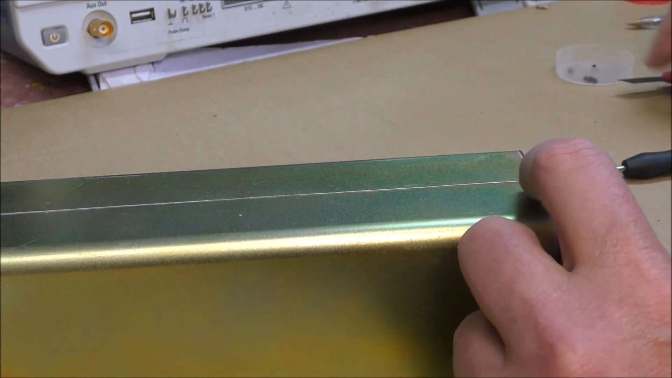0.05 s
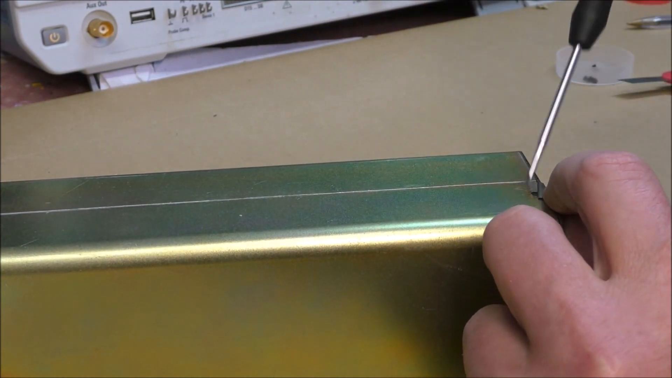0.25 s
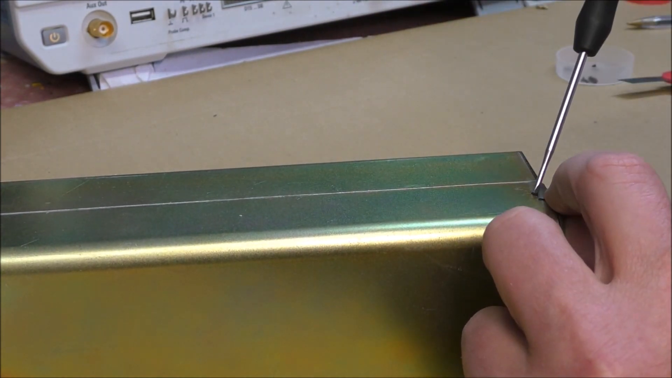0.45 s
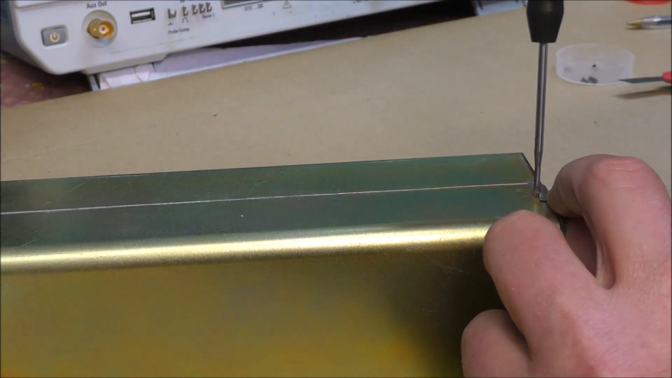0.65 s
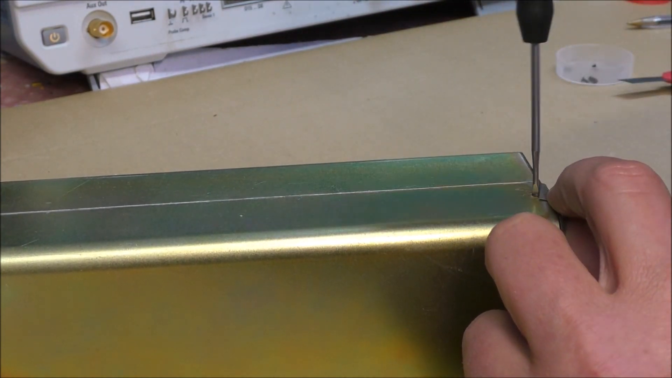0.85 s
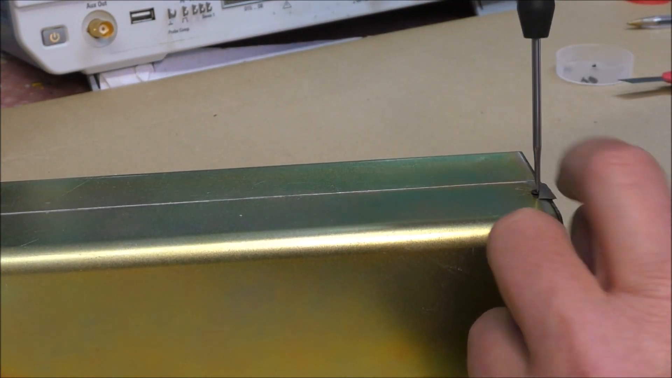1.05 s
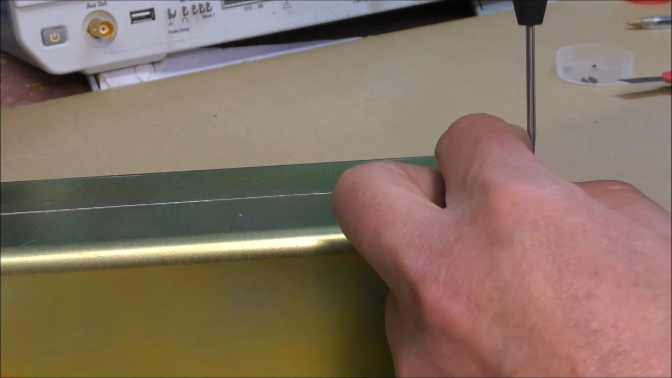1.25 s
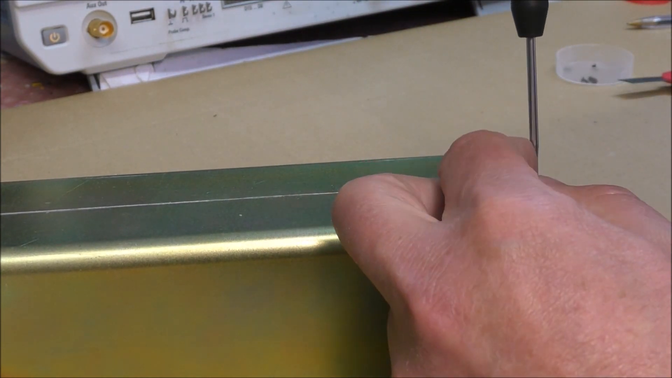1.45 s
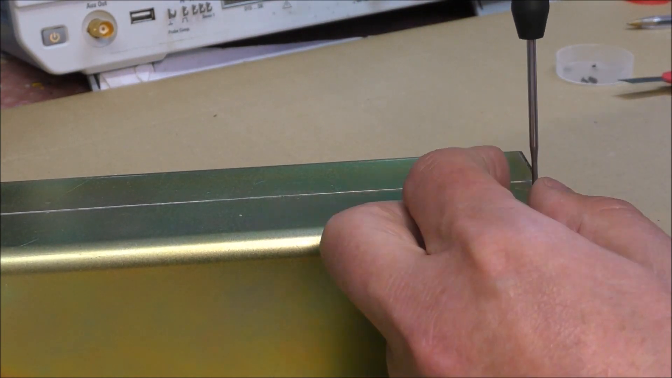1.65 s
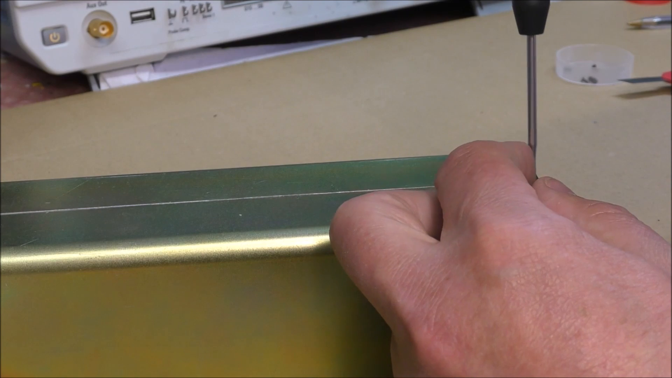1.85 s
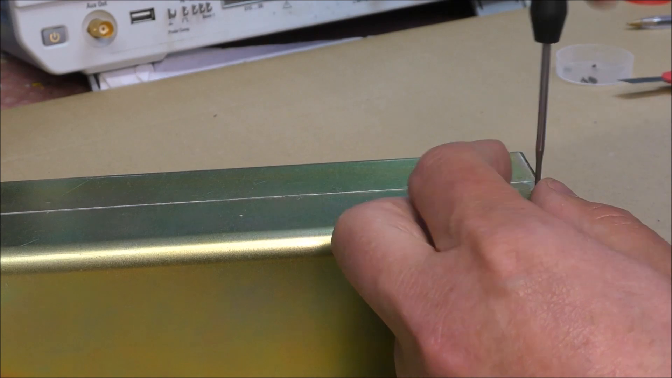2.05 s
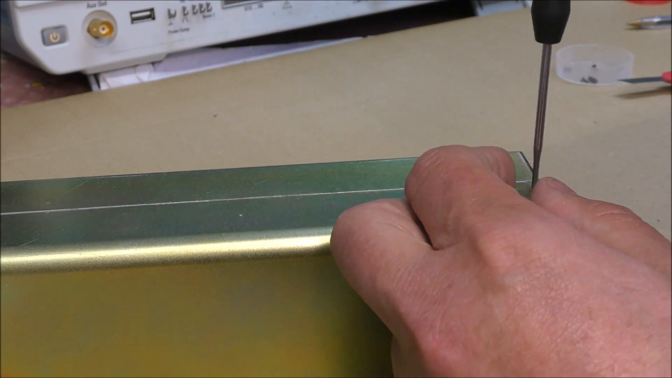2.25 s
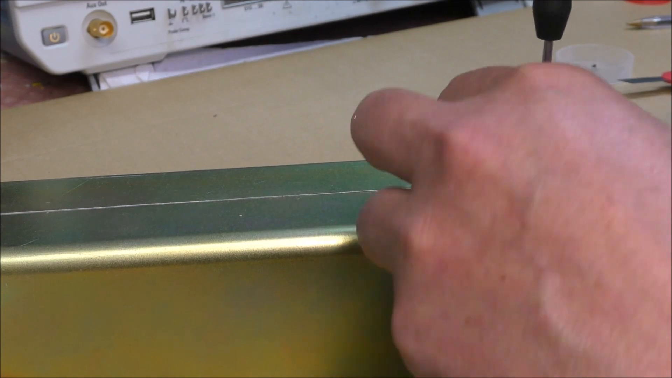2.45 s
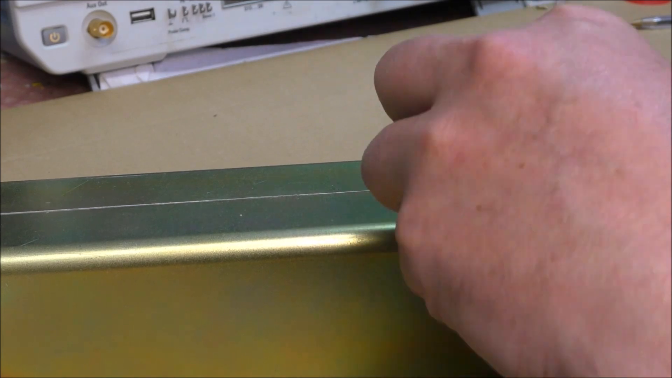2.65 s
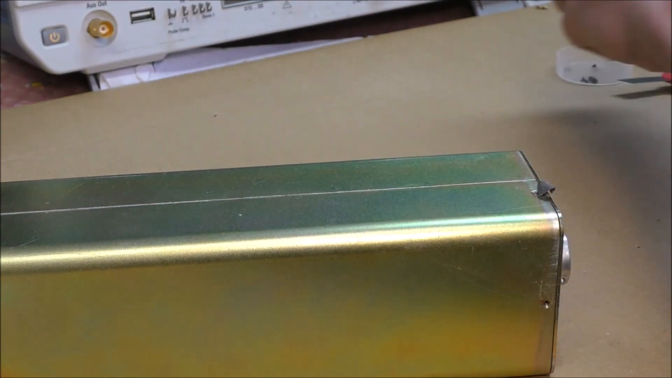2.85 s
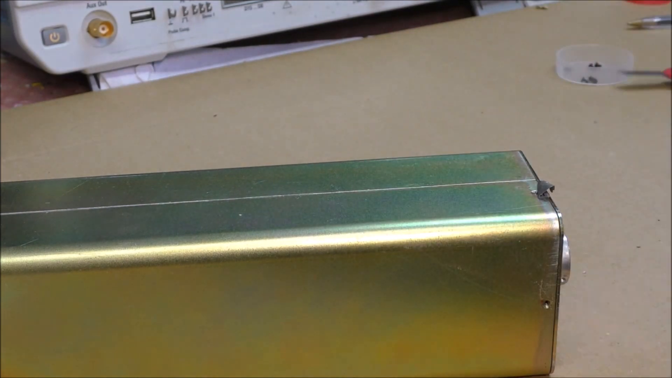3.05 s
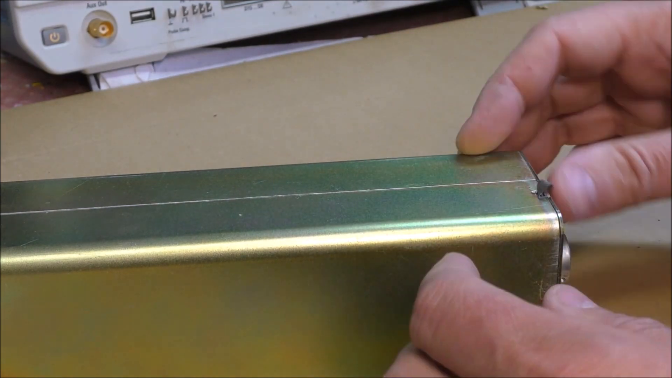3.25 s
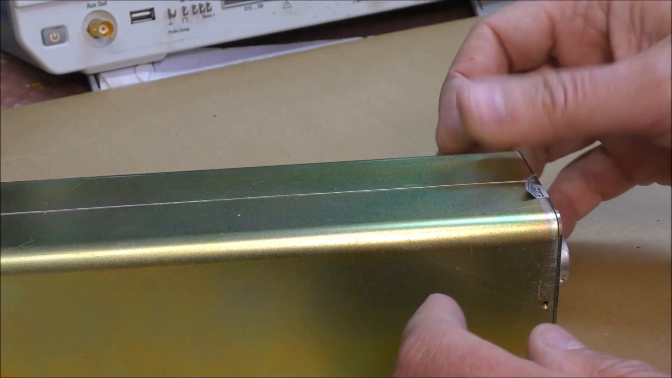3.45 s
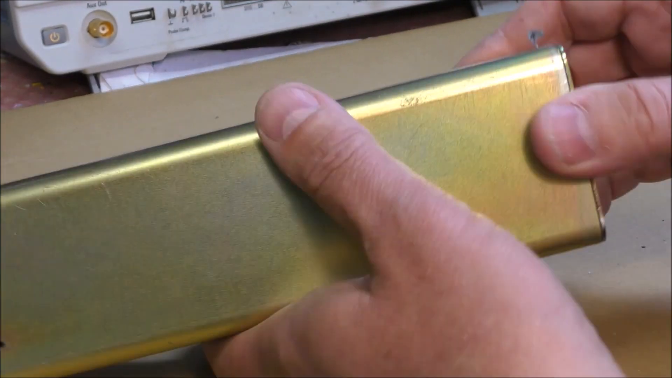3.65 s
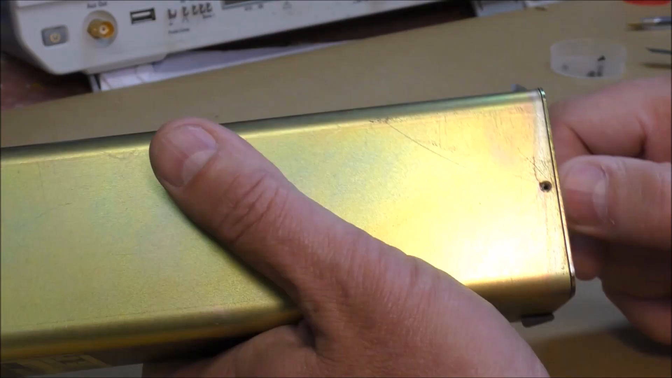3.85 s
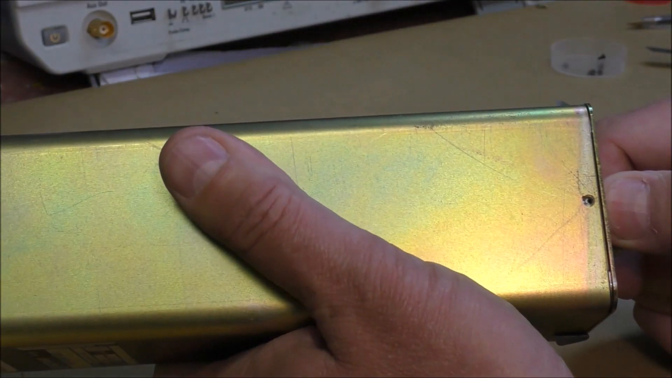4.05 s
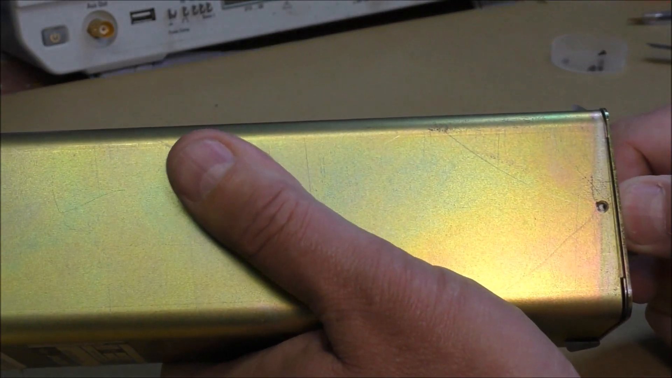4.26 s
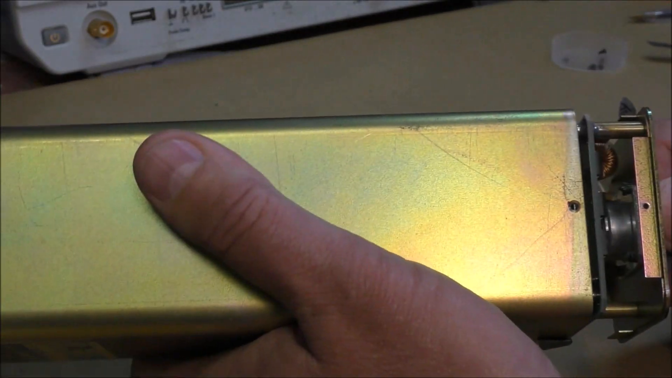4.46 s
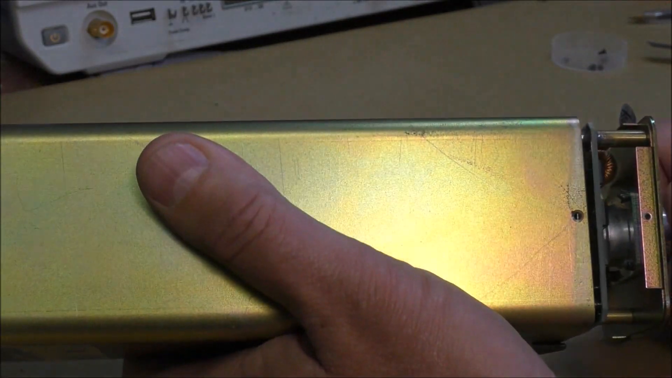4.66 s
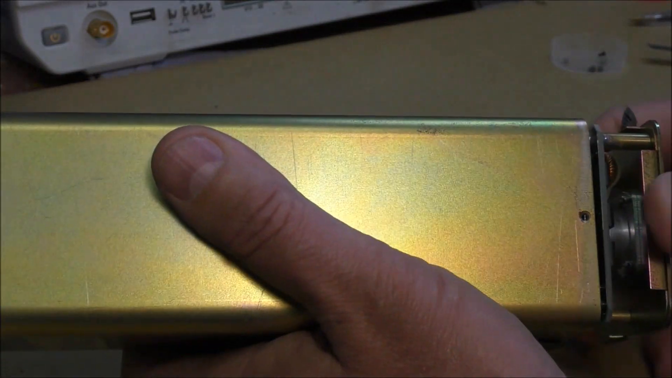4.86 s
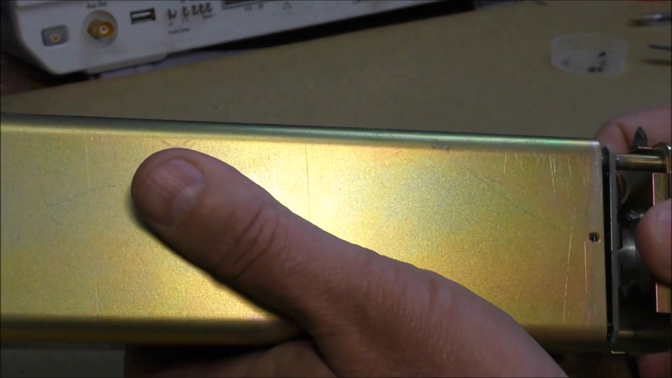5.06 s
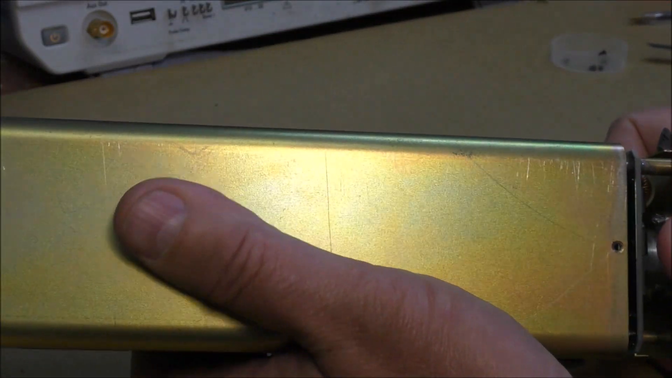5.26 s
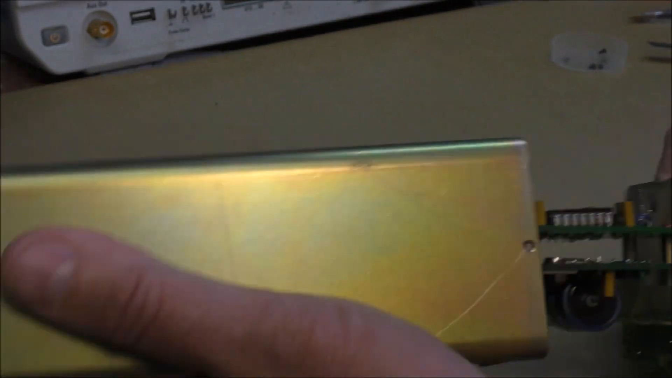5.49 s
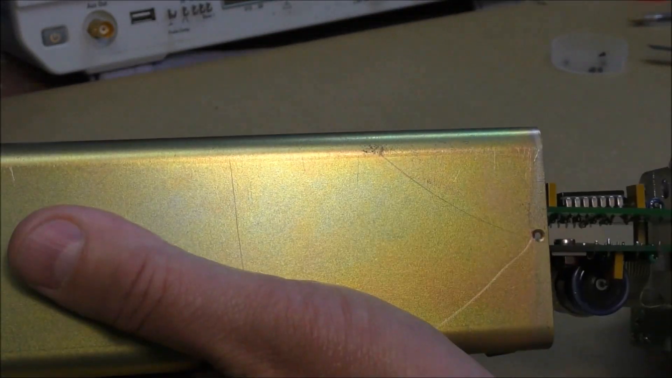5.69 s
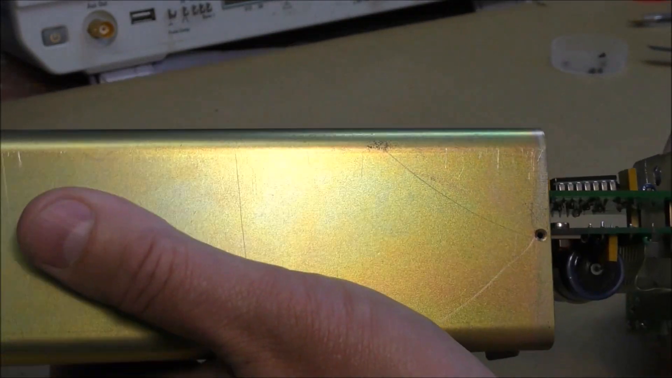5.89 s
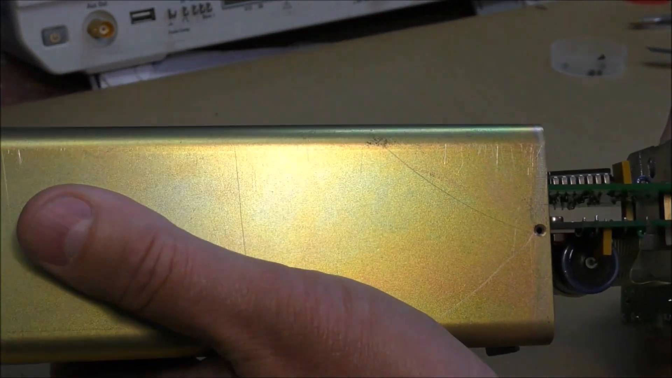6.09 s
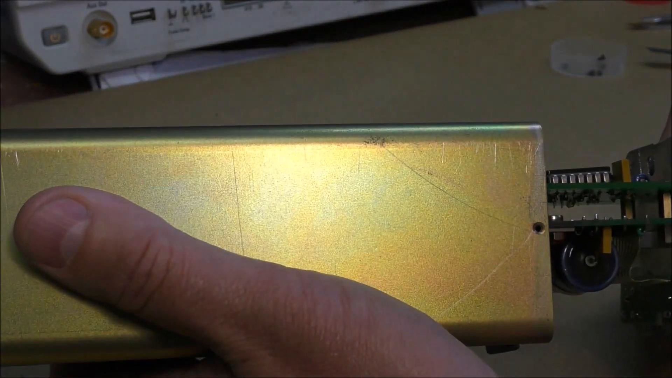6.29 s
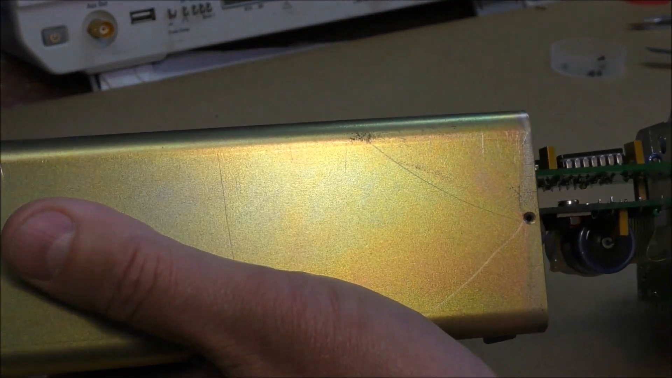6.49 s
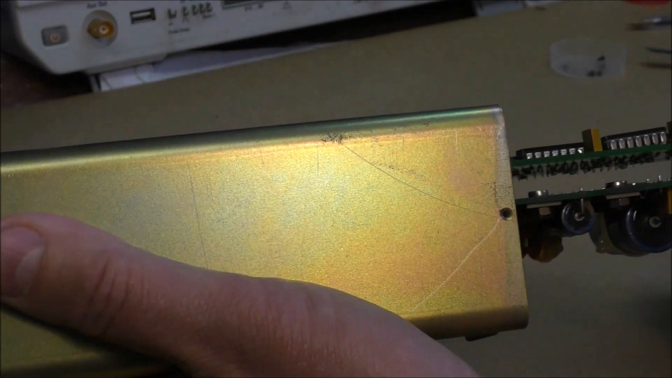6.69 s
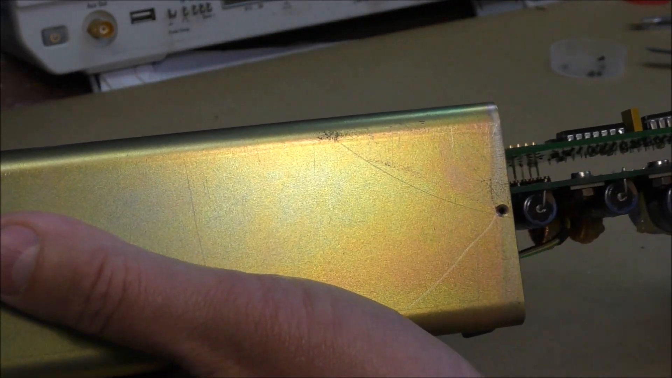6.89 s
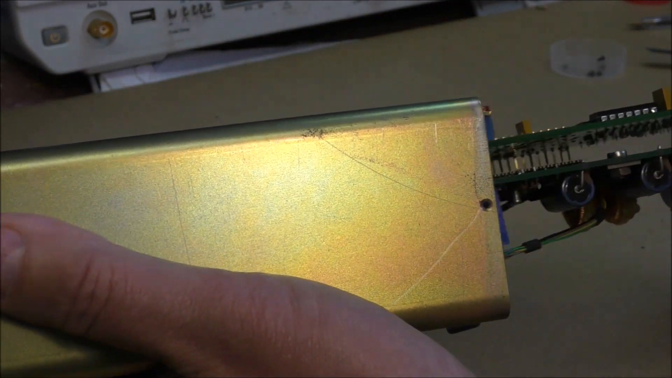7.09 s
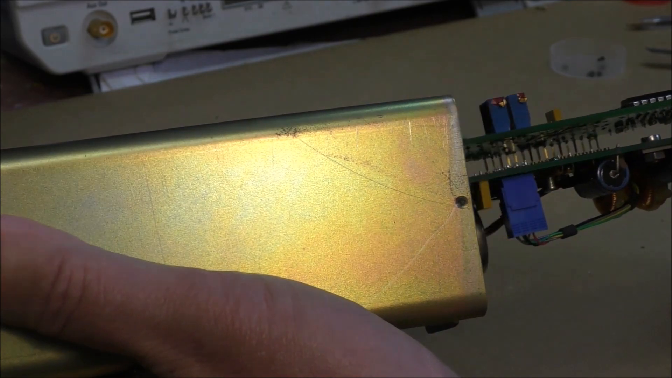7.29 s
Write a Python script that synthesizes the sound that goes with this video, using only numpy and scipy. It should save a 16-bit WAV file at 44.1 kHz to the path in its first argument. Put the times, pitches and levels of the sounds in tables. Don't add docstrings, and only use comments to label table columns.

```python
import sys
import numpy as np
from scipy import signal
from scipy.fft import rfft, irfft, next_fast_len
from scipy.io import wavfile
from scipy.ndimage import uniform_filter1d

SR = 44100
rng = np.random.default_rng(int(sys.argv[2]) if len(sys.argv) > 2 else 0)


def boost_factor(decibels):
    exponent = np.asarray(decibels, float) / 20
    return 10 ** exponent


def wav_out(sig):
    wavfile.write(sys.argv[1], SR, np.round(np.clip(np.atleast_2d(sig).T, -1, 1) * 32767).astype(np.int16))


N = 323314
CUT = int(4.02 * SR)
TIME = np.arange(N) / SR
EARS = np.array([[1], [-1]])
BANDS_HZ = 30 * 2 ** np.arange(0, 9.2, 1 / 2)


def unit(x):
    return x / np.sqrt(np.mean(x ** 2))


def read(table, hz):
    table = np.array(table)
    return np.interp(np.log(hz), np.log(table[:, 0]), table[:, 1])


def band(x, lo_hz, hi_hz):
    sos = signal.butter(2, [lo_hz, min(hi_hz, 20000)], "band", fs=SR, output="sos")
    return signal.sosfilt(sos, x + 1e-15)


def half_octave(x, hz):
    return band(x, hz / 1.19, hz * 1.19)


def wide(pair, side_db):
    return pair[0] + boost_factor(side_db) * pair[1] * EARS


def flicker(db, rate_hz, size=N):
    levels = boost_factor(db * rng.standard_normal(int(size / SR * rate_hz) + 2))
    return np.interp(np.arange(size) * (rate_hz / SR), np.arange(len(levels)), levels)


def gains(tables):
    out = np.full((len(tables[0][0]) - 1, N), 1e-9)
    for table in tables:
        s, *columns = np.transpose(table)
        span = slice(int(s[0] * SR), int(s[-1] * SR))
        out[:, span] = [boost_factor(np.interp(TIME[span], s, db)) for db in columns]
    return uniform_filter1d(out, size=200)


def strokes(table, fade_db):
    out = []
    for start, peak, end, db, bright in table:
        out.append([(start, db - fade_db, bright), (peak, db, bright), (end, db - fade_db, bright)])
    return out


def air(spectrum, size, side_db, flicker_db, rate_hz):
    lo_hz, hi_hz = spectrum[0][0], spectrum[-1][0]
    padded = next_fast_len(size)
    hz = np.maximum(np.fft.rfftfreq(padded, 1 / SR), 1)
    noise = rfft(wide(rng.standard_normal((2, padded)), side_db))
    noise = noise * boost_factor(read(spectrum, hz)) * (hz > lo_hz) * (hz < hi_hz)
    out = 0
    for mid_hz in BANDS_HZ:
        if lo_hz < mid_hz * 2 ** .5 < hi_hz * 2:
            share = np.cos(np.pi / 2 * np.clip(2 * np.log2(hz / mid_hz), -1, 1))
            out = out + flicker(flicker_db, rate_hz, size) * irfft(noise * share, padded)[:, :size]
    return unit(out)


# frequency in Hz, level in dB per Hz.
HISS_COLOUR = [(1500, -32), (2200, -34), (2970, -39), (3480, -6.5), (4550, -6.5), (5800, -1.5), (6600, -8),
               (16200, -13.5)]


def mic_hiss():
    return boost_factor(-62.5) * air(HISS_COLOUR, CUT, -1.7, 0.31, 7.2)


# frequency in Hz, level in dB per Hz.
HUM_COLOUR = [(15, -14), (60, -10.5), (160, -10), (200, 2), (240, -2.5), (290, -5), (400, -3), (600, -10)]


def building_hum():
    return boost_factor(-68) * air(HUM_COLOUR, CUT, -2.5, 2.9, 6)


# frequency in Hz, level in dB per Hz.
ROOM_COLOUR = [(15, -21), (130, 1), (240, -5), (400, -3.5), (590, -17), (800, -8), (4590, -21),
               (16200, -22.5)]


def room_tone():
    return boost_factor(-55.5) * air(ROOM_COLOUR, N - CUT, -6.0, 2.5, 4.68)


def bench_hum():
    start_s, level_db = 5.8, -61
    noise = wide(rng.standard_normal((2, N)), -5.5)
    return boost_factor(level_db) * (TIME > start_s) * unit(band(noise, 178, 212))


# centre in Hz, width in Hz, level in dB.
FAN_BANDS = [(6050, 640, -3), (11400, 1800, -2), (4300, 3300, -2)]
# start in seconds, end in seconds, level above idle in dB.
FAN_RUN_UPS = [
    (0, 0.11, 11),
    (1.25, 1.697, 8),
    (2.75, 3.386, 10.8),
    (3.706, 3.95, 12),
]


def fan():
    idle_db, t = -74.5, TIME[:CUT]
    noise = wide(rng.standard_normal((2, CUT)), -9.5)
    sound = sum(boost_factor(db) * unit(band(noise, hz - width / 2, hz + width / 2)) for hz, width, db in FAN_BANDS)
    run_db = sum(db * ((t >= start) & (t < end)) for start, end, db in FAN_RUN_UPS)
    return boost_factor(idle_db + uniform_filter1d(run_db, size=1500)) * sound


def drone(closest_s, passing_s, swell_db, hz, db):
    doppler = 0.021
    place = (TIME[:CUT] - closest_s) / passing_s
    phase = 2 * np.pi * np.cumsum(hz * (1 - doppler * np.tanh(place))) / SR
    rough = unit(band(rng.standard_normal(CUT), 0.9, 23.5))
    return boost_factor(db) * np.exp(-place ** 2) * rough * np.sin(phase)


# frequency in Hz, level in dB per Hz.
TRAFFIC_COLOUR = [(300, -39), (400, -9), (480, -1.5), (800, -5), (1760, -8.5), (2150, -15.5), (2400, -25.5),
                  (4500, -24.5)]
# closest in seconds, passing time in seconds, swell above traffic in dB,
# engine tone in Hz, tone level in dB.
VEHICLES = [
    (0.0, 0.089, 8.5, 487, -56),
    (0.631, 0.059, 6.5, 501, -49.5),
    (.6, .3, 2.5, 245, -63.5),
    (1.62, 0.06, 3, 465, -51),
    (1.83, 0.13, 10.5, 467, -53),
    (3.051, 0.218, 5.5, 529, -58),
    (3.72, 0.059, 7.5, 490, -66),
]
# closest in seconds, passing time in seconds, swell in dB, tone in Hz, level in dB.
ENGINE_WHINE = (1.88, .11, 0, 1990, -56)


def traffic():
    level_db, sag_db_per_s, t = -57, -1.47, TIME[:CUT]
    swell_db = sum(db / (1 + ((t - s) / passing_s) ** 2) for s, passing_s, db, *_ in VEHICLES)
    road = boost_factor(level_db + sag_db_per_s * t + swell_db) * air(TRAFFIC_COLOUR, CUT, -11.0, 2.5, 25.16)
    return road + sum(drone(*row) for row in [*VEHICLES, ENGINE_WHINE])


# start, peak and end in seconds, peak in dB, brightness in dB.
FINGER_STROKES = [
    (.2, .214, 0.27, -46, 9),
    (3.16, 3.215, 3.265, -36, -3),
    (3.65, 3.725, 3.81, -35, -3),
    (3.9, 3.97, 4.13, -50, -2),
]


def fingers():
    force, bright = gains(strokes(FINGER_STROKES, 24))[:, :CUT]
    noise = wide(rng.standard_normal((2, CUT)), -9.5)
    brush = unit(band(noise, 4050, 10200)) + bright * unit(band(noise, 8300, 14700))
    return force * boost_factor(-3.0) * flicker(5.1, 180, CUT) * brush


def contacts(table, rise_s, swell, snap, t60_s):
    out = np.zeros((2, N))
    lead = 1024
    t = (np.arange(4096) - lead) / SR
    shape = np.where(t < 0, swell * np.exp(-np.abs(t) / rise_s), .5 * boost_factor(-60 * t / t60_s))
    front = snap * np.exp(-np.abs(t) / 0.00024) * (t >= 0)
    for s, peak_db, hz, low_db in table:
        noise = rng.standard_normal((2, len(t)))
        burst = wide(shape * noise + front * np.sign(noise), -9.0)
        sound = .5 * band(burst, max(hz * .5, 3000), hz * 2.32)
        sound += 0.61 * band(burst, hz * 0.75, hz * 1.27)
        sound += 3 * boost_factor(low_db) * band(burst, 820, 2400)
        i = int(s * SR) - lead
        out[:, i:i + len(t)] += boost_factor(peak_db - 1) * sound
    return out


# time in seconds, peak in dB, pitch in Hz, low part in dB.
TIP_TAPS = [(0.12, -30.5, 11400, -28), (0.1498, -12.5, 4900, -9.5), (0.1574, -20, 5030, -37),
            (0.1639, -5.5, 5330, -16.5), (0.1714, -14, 5340, -18), (0.2114, -31.5, 8300, -5),
            (0.395, -27.5, 5470, -22), (0.5472, -44, 5710, -21), (0.6546, -30.5, 5960, -11),
            (0.7832, -18.5, 4870, -13), (0.8934, -34, 4300, -16), (1.2516, -40, 9300, -14),
            (1.8562, -36, 11100, -7), (1.8791, -27.5, 4300, -37), (2.0642, -32.5, 6220, -10.5),
            (2.365, -51, 9000, -30), (2.4305, -40, 11000, -13), (2.4945, -42, 5000, -13),
            (2.846, -49, 9000, -18)]
# time in seconds, peak in dB, pitch in Hz, low part in dB.
SCREW_FUMBLES = [(3.0001, -30.5, 5400, -11.5), (3.0362, -18, 12000, -28), (3.066, -13.5, 5700, -12.5),
                 (3.1604, -35.5, 9000, -10), (3.193, -25, 7400, -18), (3.2196, -24, 5060, -14),
                 (3.4241, -43.5, 13870, -23), (3.5094, -41.5, 4300, -21), (3.5753, -38.5, 5270, -14),
                 (3.6934, -26.5, 3800, -24), (3.701, -20, 11910, -20), (3.707, -17, 10700, -21.5),
                 (3.9115, -36, 3580, -13), (3.9654, -35.5, 4000, -10)]
# time in seconds, peak in dB, pitch in Hz, low part in dB.
SCREW_TURNS = [(0.9377, -34, 5430, -14), (1.0117, -33.5, 10100, -10.5), (1.09, -26.5, 12900, -18),
               (1.151, -25, 5460, -19), (1.2108, -28, 11000, -23), (2.3111, -32.5, 10400, -15),
               (2.384, -31.5, 12300, -26), (2.4505, -31, 6300, -25), (2.5156, -33, 6040, -33),
               (2.5757, -28.5, 11400, -20), (2.6379, -29, 4450, -15), (2.699, -23, 14000, -15.5),
               (2.754, -26.5, 6440, -19), (3.1746, -25.5, 11000, -38), (3.8433, -28, 7500, -18)]
# time in seconds, level in dB, pitch in Hz, T60 in seconds.
TOOL_PINGS = [
    (2.384, -31, 13500, 0.045),
    (2.383, -26, 18000, 0.033),
    (2.386, -37, 14100, .02),
    (2, -48, 2400, .03),
    (2.312, -52, 2200, .05),
    (3.709, -40, 16000, .03),
]


def tools():
    out = contacts(TIP_TAPS, 0.00061, 0.061, 0.91, t60_s=0.042)
    out += contacts(SCREW_FUMBLES, 0.00031, 0.079, 2.16, t60_s=0.061)
    out += contacts(SCREW_TURNS, 0.0086, 0.32, 1.0, t60_s=0.052)
    t = np.arange(4096) / SR
    for s, db, hz, t60 in TOOL_PINGS:
        i = int(s * SR)
        out[:, i:i + len(t)] += boost_factor(db - 60 * t / t60) * np.sin(2 * np.pi * hz * t)
    thud = slice(7200, 7300)
    out[:, thud] += boost_factor(-24) * np.exp(-.5 * ((TIME[thud] - .1645) / 2e-4) ** 2)
    return out


# start, peak and end in seconds, peak in dB, brightness in dB.
PALM_RUBS = [
    (4.7, 4.77, 4.95, -47.5, 3),
    (4.88, 4.93, 5.1, -41.5, -1),
    (5.12, 5.155, 5.25, -57, -6),
    (5.19, 5.25, 5.25, -49, -1),
    (5.886, 5.896, 5.915, -41.5, -6),
    (6.815, 6.83, 6.85, -43, -3),
]


def palm_rubs():
    out = np.zeros((2, N))
    force, bright = gains(strokes(PALM_RUBS, 20.5))
    span = slice(int(PALM_RUBS[0][0] * SR) - 200, int(PALM_RUBS[-1][2] * SR) + 200)
    noise = wide(rng.standard_normal((2, span.stop - span.start)), -9)
    hiss = unit(band(noise, 8300, 13900)) + 0.33 * bright[span] * unit(band(noise, 3500, 7500))
    out[:, span] += force[span] * hiss
    return out


# start in seconds, end in seconds, from in Hz, to in Hz, level in dB.
EDGE_SQUEALS = [(4.386, 4.476, 1400, 1950, -20), (4.384, 4.424, 3080, 3540, -26),
                (4.417, 4.461, 3750, 3910, -20), (4.423, 4.458, 7400, 7600, -24.5),
                (4.447, 4.478, 5000, 7100, -30), (4.449, 4.548, 8350, 8280, -39),
                (4.491, 4.538, 4000, 4000, -42), (4.9, 4.957, 1800, 1800, -54),
                (5.059, 5.15, 845, 896, -56), (5.221, 5.31, 1760, 1744, -56),
                (5.471, 5.503, 1755, 1600, -30), (5.589, 5.652, 9030, 8900, -23.5),
                (5.585, 5.64, 3900, 4000, -31), (5.746, 5.79, 3300, 2800, -41.5),
                (5.818, 6.39, 942, 945, -49.5), (6.07, 6.14, 1300, 945, -43),
                (6.78, 6.95, 2480, 2460, -49.5), (6.88, 7.15, 3700, 3700, -49),
                (6.44, 6.56, 1100, 840, -48.5), (7.15, 7.3, 1100, 935, -47), (6.75, 6.81, 1400, 1400, -50),
                (6.065, 6.136, 1780, 1730, -46.5), (6.455, 6.547, 1600, 1410, -46),
                (6.63, 6.745, 2000, 1960, -45), (6.637, 6.72, 4440, 4460, -41.5),
                (6.685, 6.77, 3400, 3480, -42.5), (6.607, 6.795, 942, 690, -49),
                (6.862, 6.955, 938, 932, -45), (7.097, 7.33, 3200, 2450, -51), (7.08, 6.3, 1182, 1400, -43),
                (7.081, 7.33, 1400, 1374, -44)]


def squeals():
    rough_hz, light_rough_hz, light_db = 100, 35, -41
    out = np.zeros((2, N))
    for start, end, from_hz, to_hz, db in EDGE_SQUEALS:
        rough = band(rng.standard_normal((2, 27000)), 5, rough_hz if db > light_db else light_rough_hz)[:, 500:]
        span = slice(int(start * SR), min(int(end * SR), N))
        place = (TIME[span] - start) / (end - start)
        turn = np.exp(2j * np.pi * np.cumsum(from_hz + (to_hz - from_hz) * place) / SR)
        shake = 1 + 0.63 * (unit(rough[0]) + 1j * unit(rough[1]))[:len(place)]
        swell = np.sqrt(np.sin(np.pi * np.clip(place, 0, 1)))
        out[:, span] += boost_factor(db + rng.standard_normal() * EARS) * swell * (shake * turn).imag
    return out


# time in seconds, level in dB, pitch in Hz, T60 in seconds.
CONTACT_CLANGS = [(0.393, -33, 5740, 0.029), (.784, -23, 4610, 0.02), (4.128, -36, 258, 0.17),
                  (4.127, -34, 359, 0.17), (4.126, -20.5, 3220, 0.06), (4.366, -7.5, 3160, 0.021),
                  (4.538, -24, 2200, 0.044), (4.367, -16, 1520, 0.033), (4.391, -10.5, 1530, .04),
                  (5.354, -47, 5640, 0.15), (5.354, -40, 6370, 0.093), (5.354, -47, 7596, 0.17),
                  (5.354, -44, 8301, 0.15), (5.81, -22.5, 1800, 0.051), (6.07, -35, 2710, 0.054),
                  (6.233, -40.5, 2500, 0.053), (4.56, -11, 1268, 0.039), (4.569, -26, 8980, 0.044),
                  (4.6, -19.5, 3520, 0.032), (5.295, -44, 400, .1), (5.352, -38.5, 232, 0.17),
                  (5.356, -34, 397, 0.14), (5.561, -17.5, 113, 0.23), (5.73, -24.5, 168, 0.16),
                  (5.517, -13.5, 1107, 0.054), (5.6116, -15, 1096, 0.064), (5.645, -16.5, 980, 0.17),
                  (5.516, -19, 255, 0.045), (5.567, -13, 195, 0.093), (5.732, -15, 2603, 0.079),
                  (5.775, -14, 2010, 0.052), (5.487, -13, 3890, 0.031), (5.531, -11.5, 4440, 0.027),
                  (5.558, -8, 2520, 0.045), (5.775, -26, 6150, 0.053), (4.425, -21.5, 328, 0.087),
                  (4.44, -32, 70, 0.13),
                  (5.883, -18.5, 1830, 0.034), (5.88, -24, 1130, 0.038), (5.886, -29.5, 2670, 0.061),
                  (5.915, -22, 1084, 0.05), (5.917, -33, 2470, 0.032), (5.973, -22.5, 1080, 0.043),
                  (5.981, -47, 4000, .06), (5.98, -37, 2820, 0.051), (6.012, -21.5, 1052, 0.079),
                  (6.011, -27, 1750, 0.049), (6.014, -36, 2550, 0.067), (6.068, -24.5, 1890, 0.04),
                  (6.068, -24.5, 945, 0.12), (6.152, -26.5, 945, 0.1), (6.2, -26, 945, 0.089),
                  (6.202, -37.5, 2550, .07), (6.23, -32.5, 1800, 0.094), (6.367, -28, 945, 0.095),
                  (6.365, -35, 1550, 0.032)]


def clangs():
    spread, neighbour_db, neighbour_t60, lone_hz, rise_s = 0.102, -5.5, 0.69, 1000, 0.00061
    out, t = np.zeros((2, N)), np.arange(8192) / SR
    for s, db, hz, t60 in CONTACT_CLANGS:
        pan, below, above = rng.standard_normal(3)
        near = 0
        for side, c in [(-1, below), (1, above)]:
            near = near + np.sin(2 * np.pi * hz * (1 + side * spread * (.5 + .5 * abs(c))) * t)
        ring = boost_factor(-60 * t / t60) * np.sin(2 * np.pi * hz * t)
        ring += boost_factor(neighbour_db - 60 * t / (t60 * neighbour_t60)) * near * (hz > lone_hz)
        i = int(s * SR)
        out[:, i:i + len(t)] += boost_factor(db + pan * EARS) * (1 - np.exp(-t / rise_s)) * ring
    return out


# time in seconds, pressure in dB, brightness from speed in dB.
TUG_SLIDE = [
    (4.372, -34, -20),
    (4.386, -30, -13),
    (4.394, -18.5, -12),
    (4.404, -20.5, -11),
    (4.414, -19, -1),
    (4.455, -20.5, 5),
    (4.472, -35, 8),
    (4.5, -44, 5),
]
# time in seconds, pressure in dB, brightness in dB.
PULL_SLIDE = [
    (5.469, -30.5, -2),
    (5.49, -20, -6),
    (5.53, -17.5, 4.5),
    (5.552, -25, 2.5),
    (5.572, -18, 8),
    (5.608, -32, 5),
    (5.622, -27, 8.5),
    (5.642, -36, -4),
    (5.7, -32.5, -3),
]
# time in seconds, pressure in dB, brightness in dB.
OUT_SLIDE = [(6.39, -49, -16), (6.49, -39.5, -9.5), (6.588, -46, -18), (6.63, -39.5, -5), (6.696, -37.5, 2),
             (6.8, -41.5, -3), (6.9, -39.5, -1), (7.0, -39.5, -7.5), (7.064, -41.5, -8), (7.1, -35.5, -3.5),
             (7.158, -38.5, 1.5), (7.24, -41, -2), (7.33, -43, -4)]
# start, peak and end in seconds, peak in dB, brightness in dB.
SMALL_NUDGES = [
    (4.02, 4.04, 4.12, -52, -6),
    (4.6, 4.62, 4.8, -42, -1.5),
    (4.72, 4.77, 4.94, -44.5, -2.5),
    (4.885, 4.925, 5, -44.5, 1.5),
    (5.045, 5.1, 5.17, -46, -11),
    (5.2, 5.265, 5.3, -42, -10),
]
# start in seconds, end in seconds.
PALM_REST_S = (4.66, 5.34)


def palm_rests():
    return (TIME > PALM_REST_S[0]) & (TIME < PALM_REST_S[1])


def slides():
    slips = (rng.random(N) < 5000 / SR) * boost_factor(2.43 * rng.exponential(size=N)) * rng.choice([-1, 1], N)
    ring, bright = gains([*strokes(SMALL_NUDGES, 9.5), TUG_SLIDE, PULL_SLIDE, OUT_SLIDE])
    on_bench = (TIME > PULL_SLIDE[0][0]) & (TIME < PULL_SLIDE[-1][0])
    thump = ring * boost_factor(-14 + 8 * on_bench - 10 * palm_rests())
    rumble = thump * boost_factor(-10.5 + 10.0 * on_bench)
    clank = ring * boost_factor(-0.5) * bright ** 0.24
    judder = flicker(3.0, 50) ** np.where(ring > boost_factor(-33), 1, 0.51)
    return np.array([ring, rumble, thump, clank, ring * bright]) * unit(slips) * boost_factor(-4.5) * judder


# time in seconds, peak in dB, weight in dB, edge in dB.
TUG_BLOWS = [(4.094, -49, -14, 2), (4.126, -14.5, -14.5, -5), (4.136, -35, -16, -24),
             (4.366, -12.5, -13, -6.5), (4.391, -11.5, -15, -25), (4.412, -11.5, -6, -9),
             (4.457, -13, -14, -10), (4.431, -12, -15, 2), (4.449, -6, -9, -18), (4.538, -19, -27, -11),
             (4.555, -15.5, -28, -2.5), (4.561, -9, -33, -5.5), (4.567, -33, -26, -6),
             (4.598, -17, -18.5, -1.5), (5.353, -25.5, -4, -3.5)]
# time in seconds, peak in dB, weight in dB, edge in dB.
PULL_BLOWS = [(5.476, -30, -26, 3), (5.488, -11.5, -6, 1), (5.517, -24, -14, -7), (5.495, -10, -1, -10),
              (5.528, -4.5, -9, -8), (5.556, -4.5, -23, 4), (5.566, -6.5, -3.5, -14),
              (5.572, 0.5, -10.5, -8.5), (5.6131, -6.5, -8, 0), (5.645, -5, -27, -3),
              (5.657, -10.5, 0, -26), (5.7296, -4.5, -7.5, -5)]
# time in seconds, peak in dB, edge in dB, sizzle in dB.
CHASSIS_RATTLES = [(5.773, -6.5, -8.5, -18), (5.808, -16, -10, -18.5), (5.8805, -18, -11, -19),
                   (5.916, -21, -18, -24), (5.972, -25.5, -14, -36), (5.978, -22.5, -9, -9.5),
                   (6.012, -20.5, -10, -17), (6.068, -20.5, -7.5, -12.5), (6.108, -31, -23, -38),
                   (6.152, -33, -30, -34), (6.2, -24, -14, -29.5), (6.23, -28.5, -12, -20),
                   (6.283, -31.5, -30, -38), (6.366, -33.5, -6.5, -24)]


def blows():
    rows = [(*row, -37, 3.8, -4) for row in TUG_BLOWS]
    rows += [(*row, -11.5, 3.8, -4) for row in PULL_BLOWS]
    rows += [(s, db, -50.5, edge_db, -54, 1.9, sizzle_db - edge_db)
             for s, db, edge_db, sizzle_db in CHASSIS_RATTLES]
    out, t = np.zeros((5, N)), np.arange(2048) / SR
    for s, peak_db, weight_db, edge_db, rumble_db, click, sizzle_db in rows:
        decay = 0.035 * boost_factor(-60 * t / 0.072) + np.exp(-t / 0.0021)
        rattle = rng.standard_normal(len(t)) * decay + click * (t == 0)
        parts_db = np.array([0, rumble_db, weight_db, edge_db, edge_db + sizzle_db])[:, None]
        i = int(s * SR)
        out[:, i:i + len(t)] += boost_factor(peak_db + 17.5 + parts_db) * rattle / np.sqrt(np.sum(rattle ** 2))
    return out


FORCE_EDGES_HZ = [200, 600, 2300, 5000]
FORCE_ORDER = [1, 2, 0, 3, 4]
STAGE_STARTS_S = [4.02, 5.44, 6.39]
# frequency in Hz, level in dB, T60 in seconds.
FULL_MODES = [(325, -10, 0.14), (802, -21.5, 0.099), (1235, -15, 0.14), (1540, -26, 0.23),
              (1514, -19.5, 0.076), (1610, -16.5, 0.03), (1800, -8.5, 0.072), (2536, -9, 0.074),
              (3180, -12.5, 0.034), (3630, -8.5, 0.05), (4000, -19, 0.25), (6030, -18, .05),
              (7670, -24, 0.13), (8340, -20, 0.1)]
# frequency in Hz, level in dB, T60 in seconds.
HALF_MODES = [(304, -8, 0.15), (819, -17.5, 0.18), (945, -8, 0.19), (1056, -10.5, 0.13), (1253, -17, 0.24),
              (1410, -36, 0.16), (1594, -19, 0.088), (1837, -14.5, 0.047), (1960, -23, 0.21),
              (2550, -10, 0.1), (2890, -21, 0.13), (3450, -18, 0.15), (3800, -28, 0.22)]
# frequency in Hz, level in dB, T60 in seconds.
EMPTY_MODES = [(630, -14, 0.071), (807, -15, 0.066), (940, -5.5, 0.2), (1195, -5, 0.036),
               (1408, -6.5, 0.078), (1925, -12.5, 0.11), (2436, -8, 0.068), (2880, -10, 0.025),
               (3313, -7.5, 0.029), (3870, -10, 0.061), (4440, -13, 0.04)]
# frequency in Hz, level in dB, T60 in seconds.
BRACKET_MODES = [(6050, -17.5, 0.056), (8770, -11, .13), (2680, -12.5, 0.1)]
CONTACT_FLICKER_DB = [3.5, 2.5, 3, 4]
GRIP_ENDS_S = 5.85


def modes(push, stage):
    grip_db, palm_db = -6.5, -4.5
    out = np.zeros((2, len(stage)))
    palm = boost_factor(palm_db * palm_rests()[CUT:])
    for index, table in enumerate([FULL_MODES, HALF_MODES, EMPTY_MODES, BRACKET_MODES]):
        now = stage == index if index < len(STAGE_STARTS_S) else stage == 1
        span = slice(np.argmax(now), len(now) - np.argmax(now[::-1]) + SR // 2)
        grip = boost_factor(grip_db * (TIME[CUT:] < GRIP_ENDS_S) * (index == 1))
        for hz, db, t60 in table:
            r, w = boost_factor(-60 / (t60 * SR)), 2 * np.pi * hz / SR
            part = FORCE_ORDER[np.searchsorted(FORCE_EDGES_HZ, hz)]
            drive = push[part] * now * (grip if hz < 1100 else 1) * palm
            drive = drive * flicker(CONTACT_FLICKER_DB[index], 9, len(stage))
            drive = drive * boost_factor(db) * np.sqrt(4 * (1 - r)) * np.sin(w)
            b = 1 / (2 * np.sin(w))
            mode = signal.lfilter([b, 0, -b], [1, -2 * r * np.cos(w), r * r], drive[span] + 1e-15)
            out[:, span] += mode * boost_factor(2.78 * rng.standard_normal() * EARS)
    return out


# frequency in Hz, level in dB per Hz.
SHEET_COLOUR = [(25, -19), (114, 3.5), (677, -1), (962, 4.5), (2220, -1.5), (6920, -12.5), (9070, -12.5),
                (16000, -17)]
# frequency in Hz, T60 in seconds.
SHEET_DECAY = [(60, 0.027), (400, 0.051), (1200, 0.15), (3500, 0.16), (9000, 0.16), (15000, 0.014)]
# frequency in Hz, side level in dB.
SHEET_WIDTH = [(60, 2), (500, -8), (8000, -8.5), (13000, -5.5)]
STAGE_RING_DB = [-3.5, -2.5, -2.5]


def case():
    push = (slides() + blows())[:, CUT:]
    t, size = TIME[CUT:], push.shape[1]
    noise = rng.standard_normal((2, size))
    part = np.array(FORCE_ORDER)[np.searchsorted(FORCE_EDGES_HZ, BANDS_HZ)]
    colour = boost_factor(read(SHEET_COLOUR, BANDS_HZ))
    hollow = np.interp(t, [5.0, 5.8], [.25, 1.2])
    stage = np.searchsorted(STAGE_STARTS_S, t + 1e-3) - 1
    sheet = 0
    for hz, k, level in zip(BANDS_HZ, part, colour):
        gain = level / np.sqrt(np.sum((colour ** 2 * BANDS_HZ)[part == k]) * .35 * 2 / SR)
        kept = boost_factor(-120 / (read(SHEET_DECAY, hz) * SR))
        energy = signal.lfilter([1 - kept], [1, -kept], push[k] ** 2 + 1e-24)
        stored = np.sqrt(np.abs(energy))
        shifted = np.roll(noise, int(hz) * 2, axis=1)
        ring = wide(half_octave(shifted * stored, hz), read(SHEET_WIDTH, hz))
        direct = half_octave(half_octave(push[k], hz), hz)
        heard = 0.5 * direct + 1.047 * flicker(3.0, 39.77, size) * ring
        sheet = -sheet + gain * (hollow if 600 < hz < 1100 else 1) * heard
    ring_db = np.array(STAGE_RING_DB)[stage] - 2.5 * (stage == 1) * (t > GRIP_ENDS_S)
    return np.pad(sheet * boost_factor(ring_db) + modes(push, stage), ((0, 0), (CUT, 0)))


def room_reply(near):
    t = np.arange(8192) / SR
    echo = band(rng.standard_normal((2, len(t))), 180, 6400) * boost_factor(-60 * t / 0.35) * (t > .004)
    return boost_factor(-44.0) * signal.oaconvolve(echo, near[:1], axes=1)[:, :N]


def scene():
    near = tools() + palm_rubs() + squeals() + clangs() + case()
    out = near + room_reply(near) + bench_hum()
    out[:, :CUT] += mic_hiss() + building_hum() + fan() + traffic() + fingers()
    out[:, CUT:] += room_tone()
    return out


def band_limit(x):
    return signal.sosfilt(signal.butter(12, 16340, fs=SR, output="sos"), x)


def record(dry):
    bent = dry + 0.23 * band(dry ** 2, 12, 300)
    top_cut = signal.sosfilt(signal.ellip(6, .2, 25, 15750, fs=SR, output="sos"), bent)
    return band_limit(np.clip(top_cut, -.99, .99))


dry = scene()
out = record(dry)
wav_out(out)
```